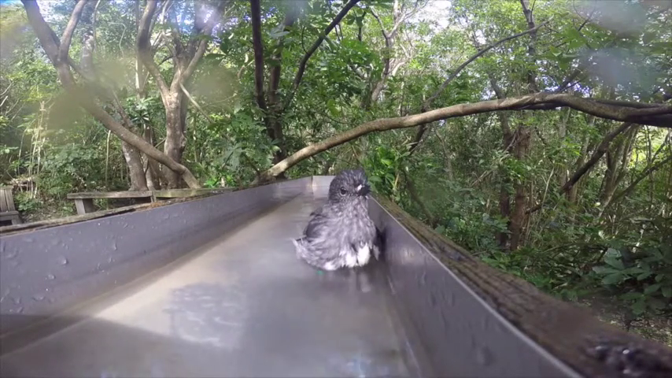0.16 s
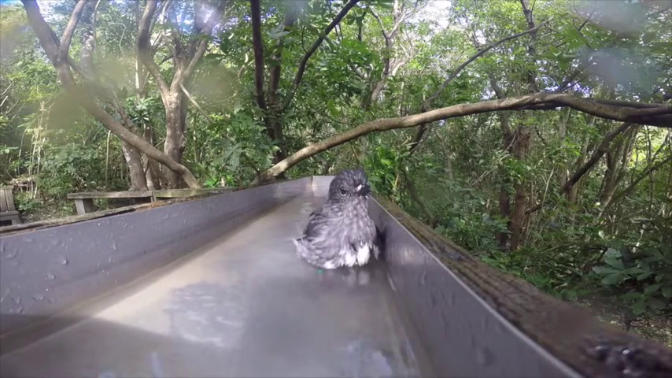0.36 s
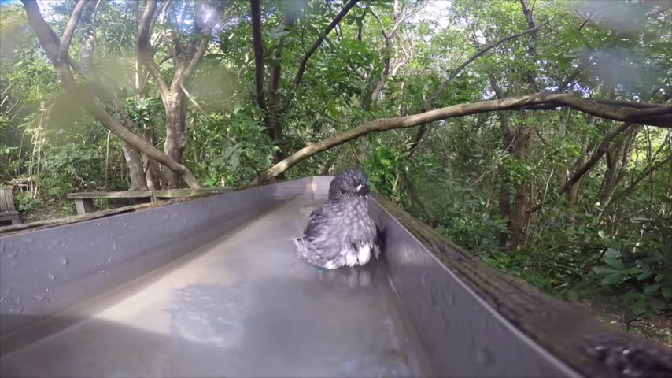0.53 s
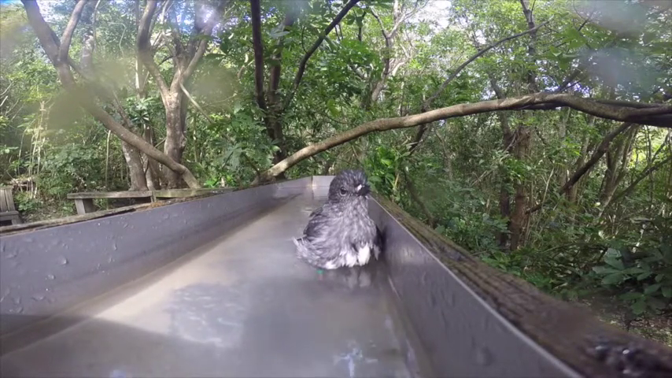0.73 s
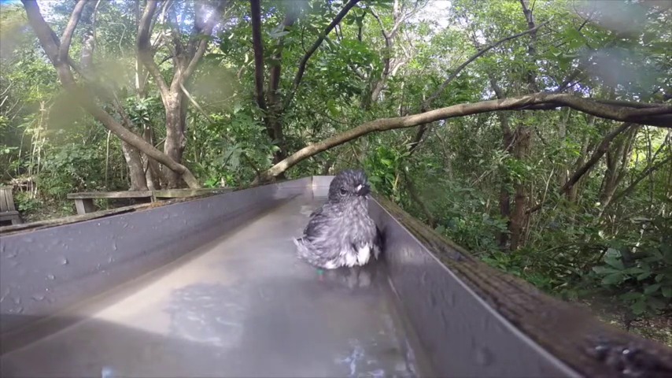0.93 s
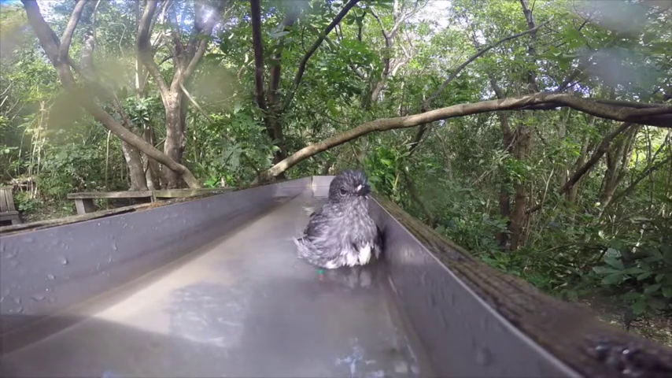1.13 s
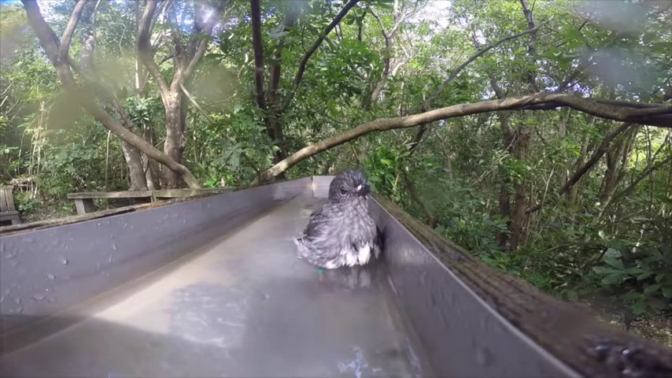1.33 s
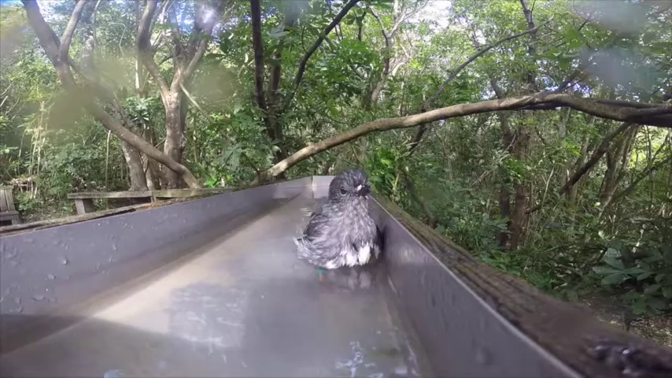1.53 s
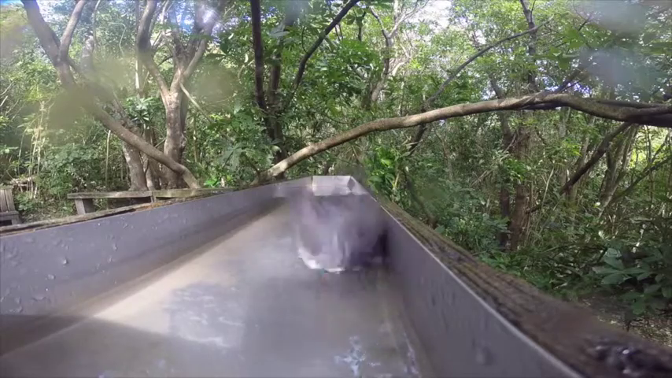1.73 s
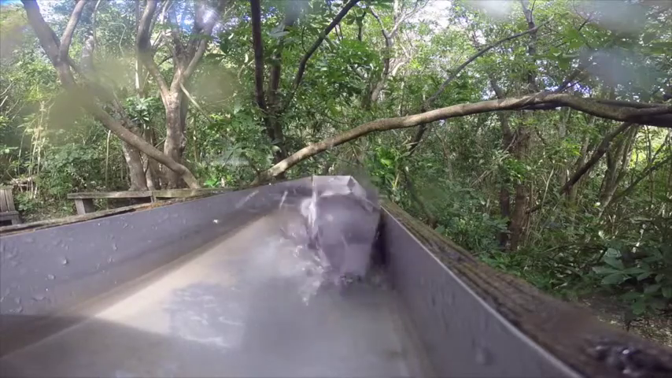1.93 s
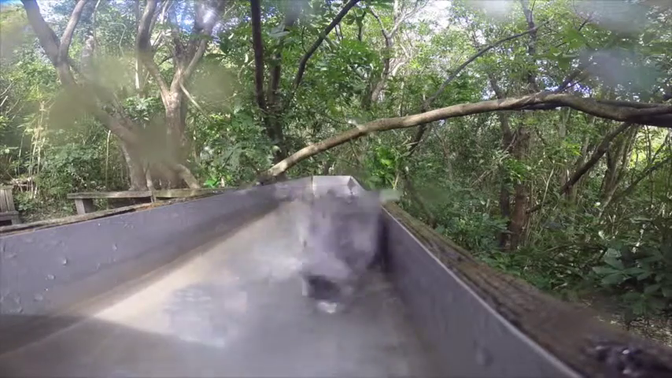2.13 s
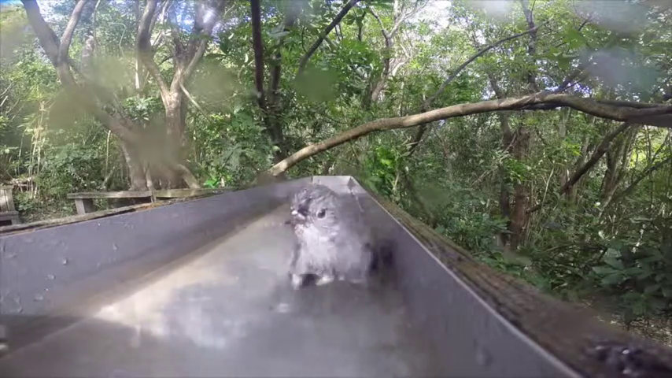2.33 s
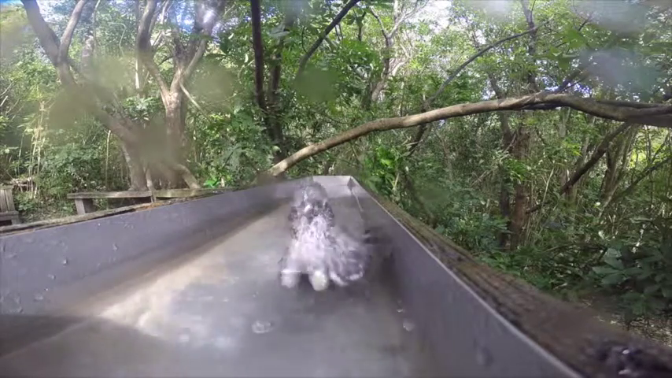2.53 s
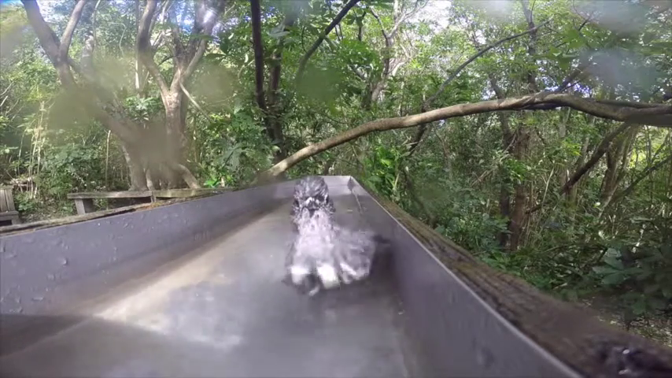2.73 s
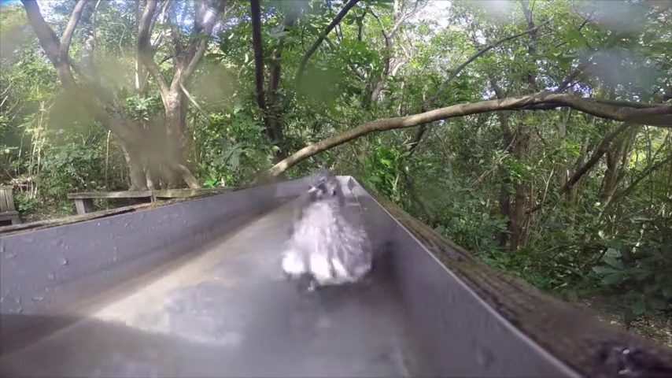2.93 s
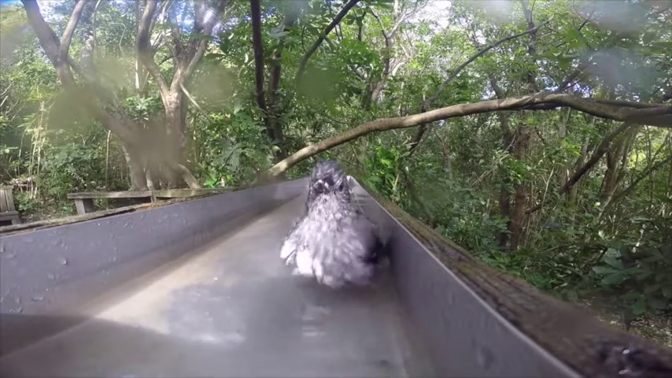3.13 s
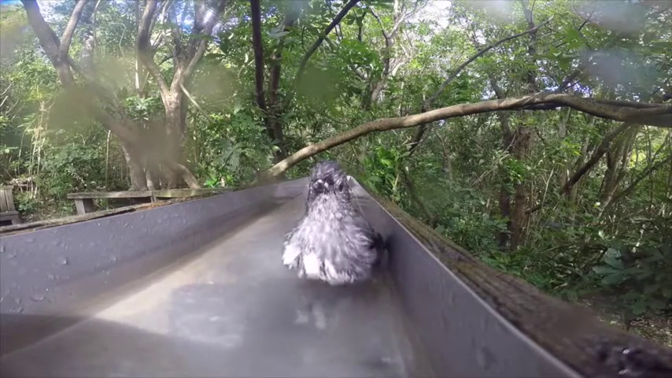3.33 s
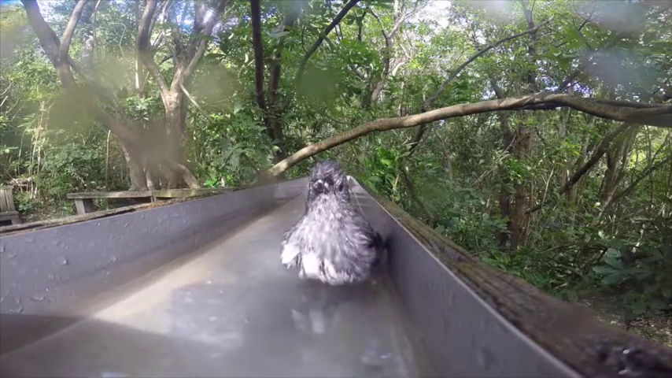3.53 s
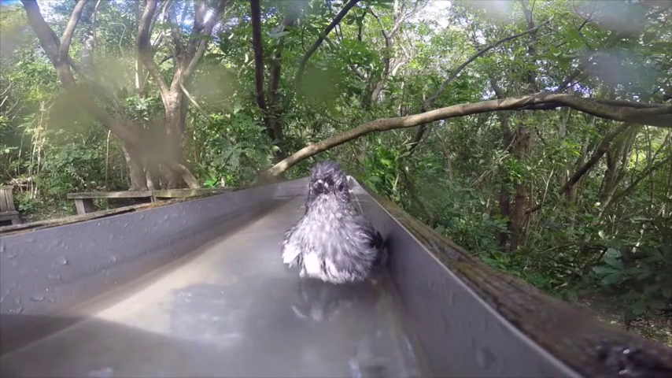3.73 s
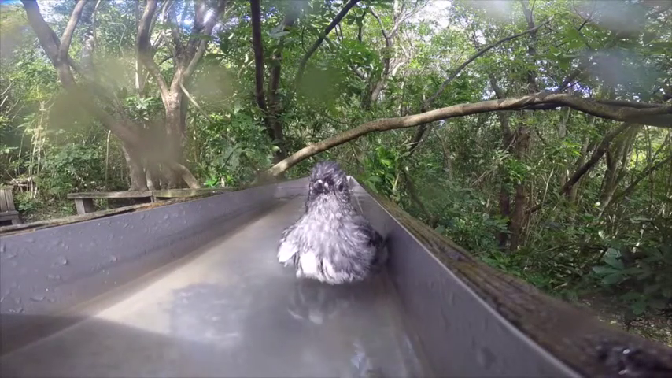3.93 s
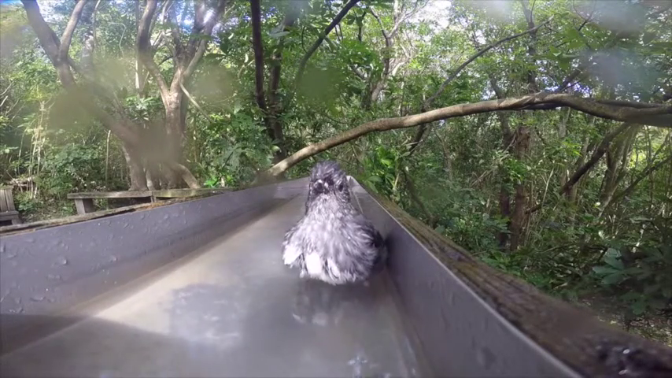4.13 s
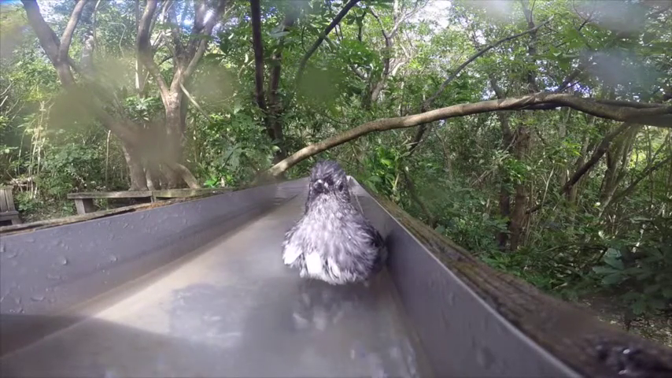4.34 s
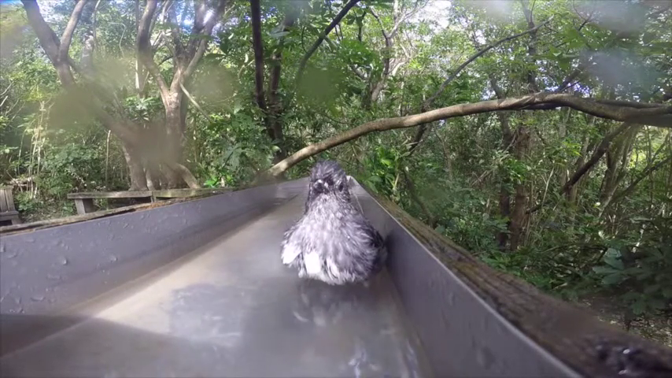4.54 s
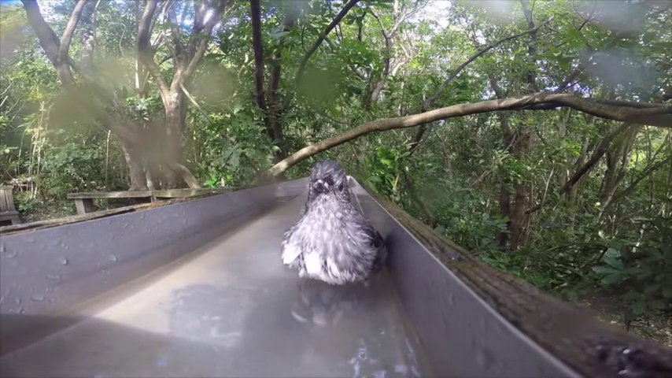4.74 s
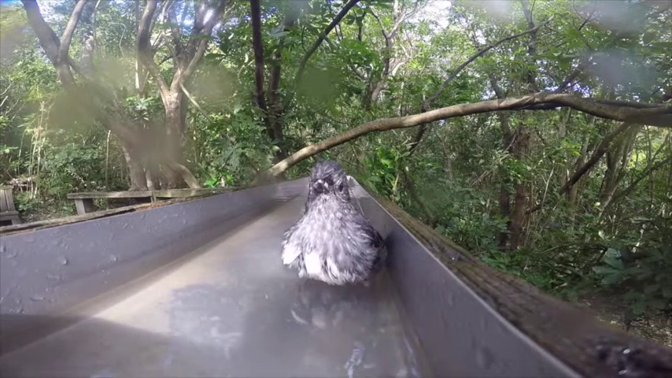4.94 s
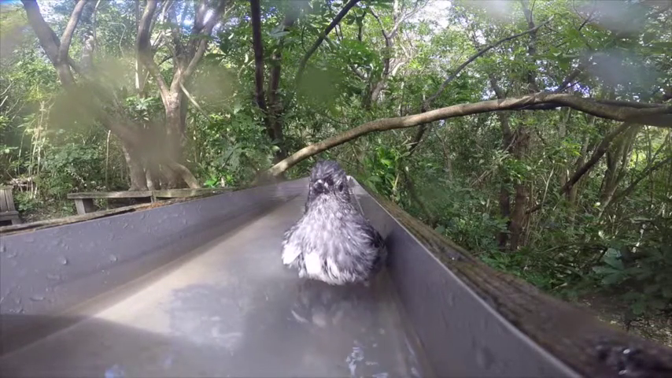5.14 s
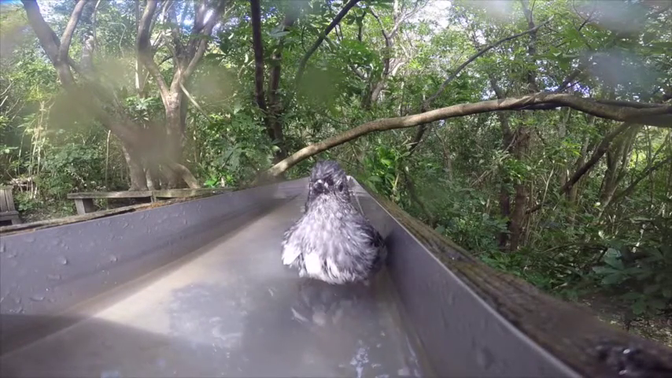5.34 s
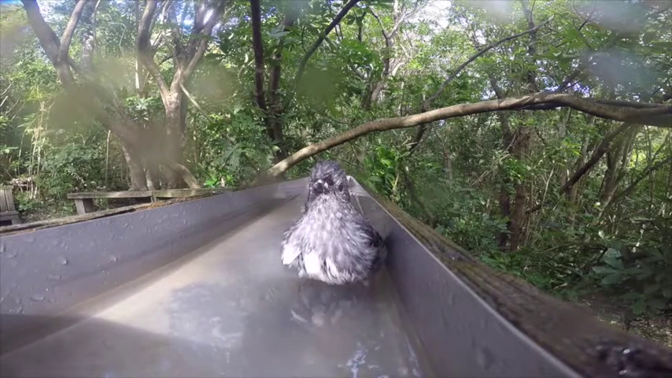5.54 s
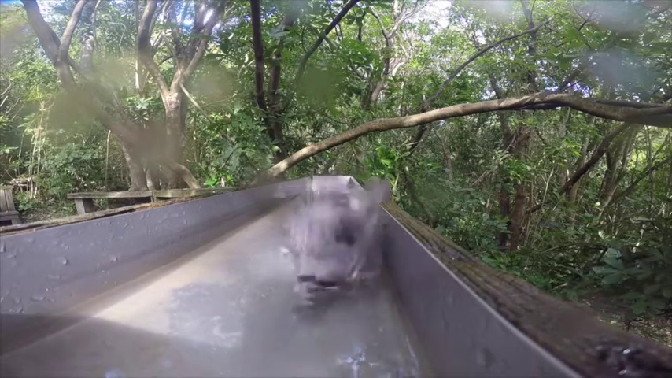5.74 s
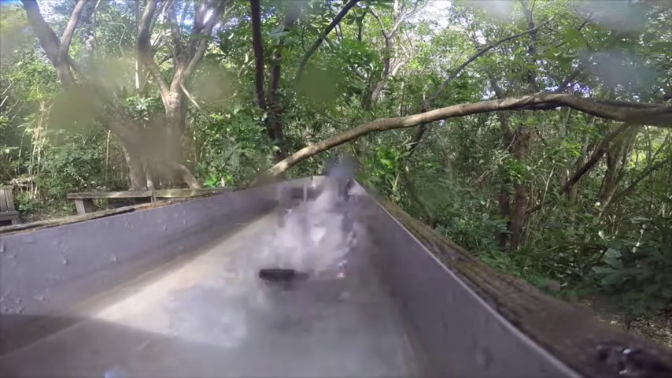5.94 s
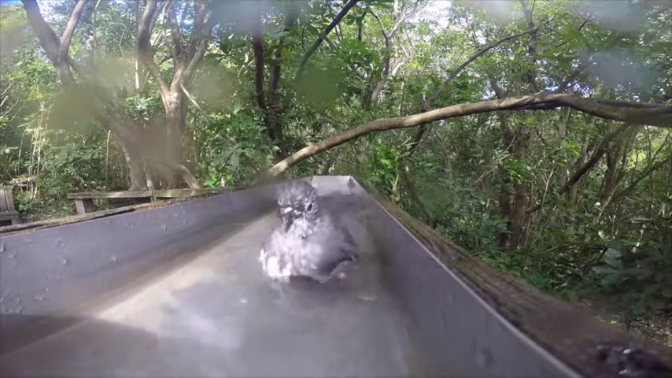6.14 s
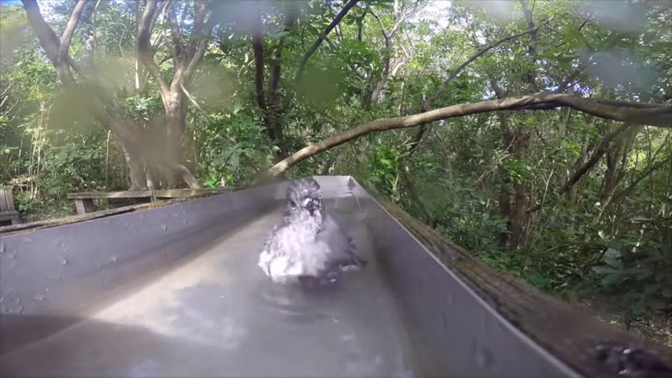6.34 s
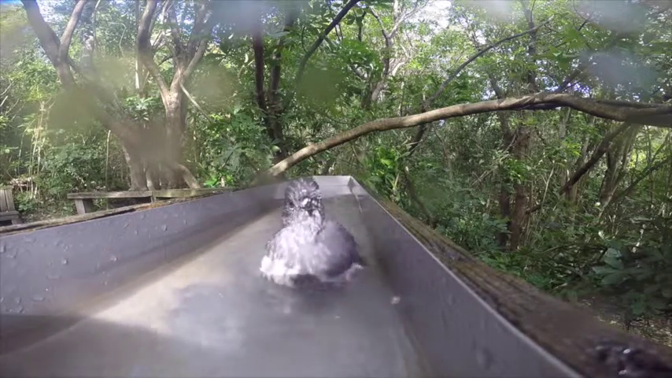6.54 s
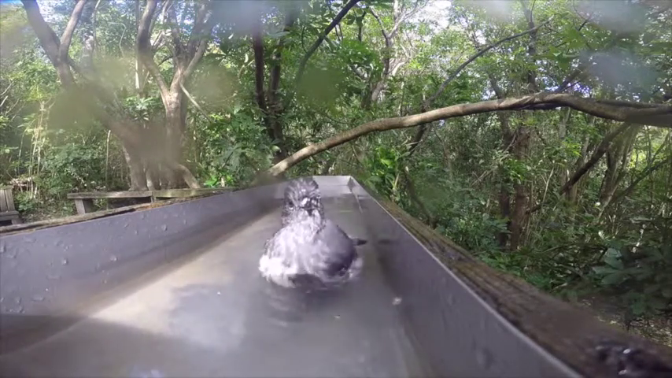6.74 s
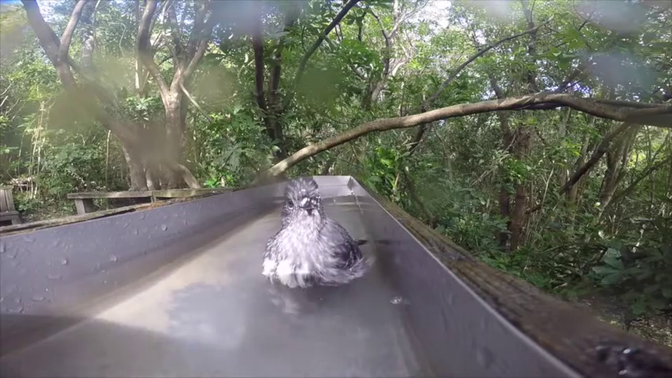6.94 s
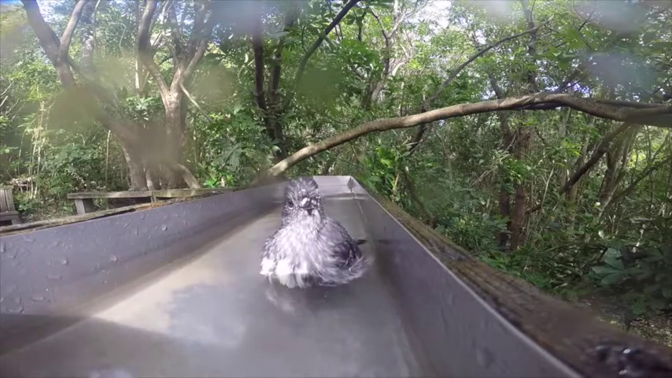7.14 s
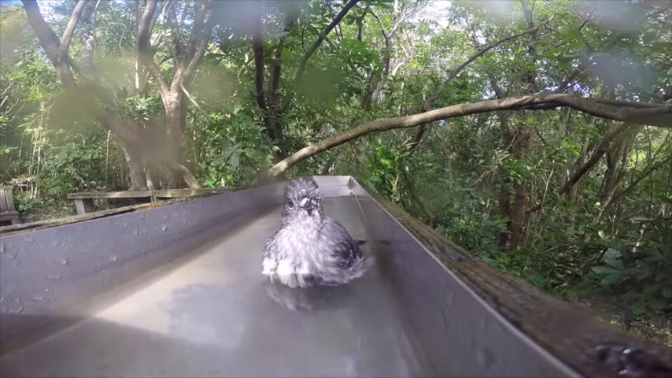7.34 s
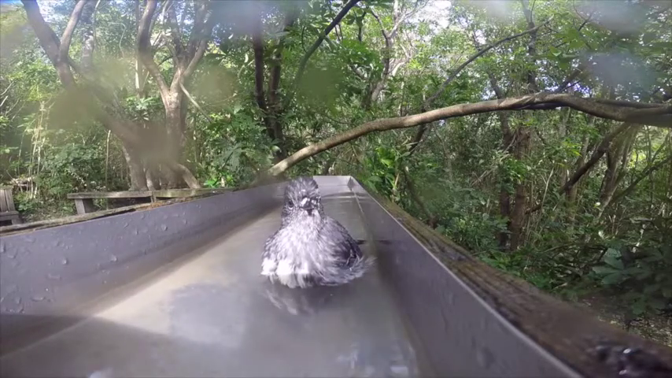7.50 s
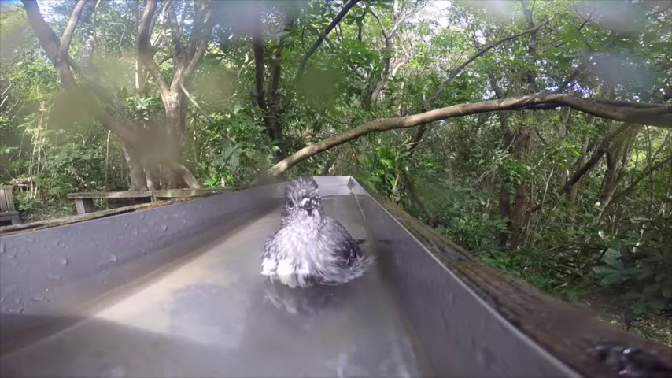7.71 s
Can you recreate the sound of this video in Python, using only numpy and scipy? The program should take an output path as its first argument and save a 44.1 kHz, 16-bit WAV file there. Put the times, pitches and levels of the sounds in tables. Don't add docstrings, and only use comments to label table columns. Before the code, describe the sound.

A small bird bathes in a shallow sheet-metal trough in a quiet wood, heard from a camera inside the trough. After a near-silent start, rapid wing slaps, knocks and pings erupt with drumming water, spray and low panel booms. A clear bubble plink and a smaller heave follow. Quiet hiss and faint claw shifts lead to a second splashing bout, which settles into air with a distant bird whistle.

```python
import sys
import numpy as np
from scipy import signal
from scipy.fft import rfft, irfft
from scipy.io import wavfile
from scipy.ndimage import uniform_filter1d

SR = 44100
rng = np.random.default_rng(int(sys.argv[2]) if len(sys.argv) > 2 else 0)


def wav_record(signal):
    frames = np.transpose(np.atleast_2d(signal))
    bounded = np.clip(frames, -1, 1)
    quanta = np.round(bounded * 32767).astype(np.int16)
    wavfile.write(sys.argv[1], SR, quanta)


def undo_db(level):
    steps = np.asarray(level, float) / 20
    return 10 ** steps


N = 342657

# [t/s, peak level/dB, centre f/Hz, t60/s]
KNOCKS = [(1.725, -51, 1490, 0.19), (1.79, -40.5, 587, 0.17), (1.832, -26.5, 620, 0.11),
          (1.853, -14, 870, 0.11), (1.99, -24, 925, 0.047), (2.115, -28, 397, 0.11),
          (2.248, -17.5, 352, 0.17), (2.336, -42, 303, 0.045), (2.397, -44, 930, 0.034),
          (2.788, -38, 970, 0.4), (3.071, -40, 584, 0.14), (3.142, -30.5, 610, 0.11),
          (3.159, -33, 520, 0.061), (3.236, -38, 1500, 0.046), (4.002, -38, 1030, 0.049),
          (5.647, -45, 700, 0.16), (5.722, -26.5, 630, 0.073), (5.791, -14, 398, 0.08),
          (6.002, -24, 1210, 0.04), (5.936, -30, 875, .06), (6.148, -33.5, 890, .05),
          (6.205, -34.5, 480, 0.05), (6.296, -35, 885, .04), (6.268, -29, 595, 0.032),
          (6.328, -22, 885, 0.044), (6.394, -23.5, 480, 0.07), (6.4, -27, 950, 0.07),
          (6.458, -25.5, 810, 0.07), (6.537, -30.5, 644, 0.057), (6.69, -35, 590, 0.057),
          (6.76, -34.5, 930, 0.057), (6.814, -42, 1120, 0.08), (6.843, -40.5, 880, .08),
          (2.071, -26.5, 985, .05), (2.62, -40, 945, .07), (2.662, -34.5, 940, .08), (3.038, -45, 950, .07),
          (3.233, -37, 950, .06), (6.56, -32.5, 280, 0.068), (6.755, -40, 326, .08), (1.8, -54, 267, .1),
          (2.3, -23.5, 256, 0.08)]
# [t/s, peak level/dB, centre f/Hz, t60/s]
THUMPS = [(1.835, -27, 270, .08), (1.856, -20.5, 267, 0.075), (2.119, -21, 190, .06),
          (2.163, -20.5, 210, .05), (2.25, -19.5, 200, .08), (3.275, -39, 230, .12), (6.46, -33, 330, .08),
          (4.004, -47, 1050, 0.23), (0, -33, 1310, 0.069), (1.853, -10, 450, 0.018),
          (2.117, -15, 303, 0.041), (2.249, -17, 930, 0.097), (3.995, -41.5, 574, 0.077),
          (5.792, -10.5, 520, 0.024), (5.8, -17, 145, 0.21), (5.799, -25.5, 606, 0.34)]
# [t/s, peak level/dB, centre f/Hz, t60/s]
SLAPS = [(1.8214, -34, 1300, .05), (2.342, -24, 2200, 0.056), (1.8525, -15.5, 1690, 0.17),
         (3.174, -28.5, 1360, 0.12), (5.664, -39.5, 1670, 0.068), (5.7214, -19, 1810, 0.12),
         (5.7916, -12.5, 2170, 0.075), (6.2373, -30, 2340, 0.031), (6.3963, -25, 1540, 0.14),
         (6.459, -29, 1560, 0.068), (6.611, -29.5, 1340, 0.16)]
# [t/s, peak level/dB, centre f/Hz, t60/s]
PINGS = [(1.8214, -31.5, 1640, 0.48), (1.929, -10.5, 2330, 0.072), (1.9613, -21.5, 2350, 0.033),
         (2.016, -26, 2470, 0.18), (2.0706, -22, 1630, 0.046), (2.1386, -12, 1640, 0.1),
         (2.298, -21, 2120, 0.1), (2.6217, -46, 2300, 0.035), (4.0314, -51, 1760, 0.08),
         (5.935, -40, 2410, 0.093), (6.0028, -22.5, 1830, 0.15), (6.09, -35, 1920, 0.08),
         (5.905, -31, 2150, 0.036), (6.2021, -32, 1790, 0.06), (6.2955, -30.5, 2620, 0.018),
         (6.3316, -35, 2190, 0.064), (6.537, -37.5, 1700, 0.078), (6.5542, -33, 1890, 0.098),
         (6.7392, -38, 2190, 0.16)]
# [t/s, peak level/dB, centre f/Hz]
CLAWS = [
    (0.548, -50.5, 780),
    (0.68, -55.5, 950),
    (3.479, -52, 846),
    (3.552, -53, 800),
    (3.647, -50, 725),
    (3.778, -51, 790),
    (4.309, -52.5, 873),
]
CLAW_T60_S = 0.1
KNOCK_WIDTH, THUMP_WIDTH, SLAP_WIDTH, PING_WIDTH = 0.48, 0.9, 0.64, 0.15
BLOW_RISE_S = 0.001

# [f/Hz, level/dB per Hz]
TROUGH_COLOUR = [(100, -38), (170, -0.5), (231, -8), (513, -4), (724, -9), (860, 0.5), (1010, -4),
                 (1480, -12.5), (2500, -15), (3200, -36), (4160, -73), (7040, -120)]
# [f/Hz, width/Hz, level/dB]
TROUGH_MODES = [(328.5, 36, 4.9), (354, 4, 10.1), (413.8, 4.8, 7.2), (530, 37, 0.83), (611.7, 28, 10.6),
                (855, 11, 4), (947, 13, 4), (1112, 19, 1.5), (1311, 43, 3.6), (1640, 16, 2.6),
                (1690, 67, 4.5), (1943, 19, 0.93), (2190, 63, 2.3), (2556, 33, 9.9)]
# [f/Hz, t60/s]
HAZE_T60 = [(200, 0.25), (900, 0.3), (3000, 0.024)]

# [t/s, churn level/dB, fling/dB: how much water leaves the surface]
BOUTS = [
    [(0.0, -57.5, 5.5), (0.2, -91, -16)],
    [(1.72, -61, -2), (1.824, -47, -6), (1.964, -37.5, -9.5), (2.012, -35, -7.5), (2.198, -32.5, -14.5),
     (2.374, -42.5, -7), (2.674, -46.5, -7.5), (2.814, -43.5, -9), (3.12, -52.5, -9.5)],
    [(3.13, -41.5, -8.5), (3.304, -56, -18), (3.6, -84, -28)],
    [(3.92, -61.5, -15), (3.99, -57.5, -4), (4.01, -66.5, 9.5), (4.15, -72, -11.5)],
    [(5.64, -67, 1.5), (5.715, -50.5, -9.5)],
    [(5.72, -47, 8), (5.9, -44.5, -4), (6.21, -50, -7.5), (6.474, -39.5, -11.5), (6.525, -46.5, -17),
     (6.56, -46.5, -6.5), (6.706, -48, -8.5), (6.866, -58, -10.5), (7.3, -78, -2)],
]
SPLIT_HZ = 1400
SPRAY_DB, SPRAY_PER_FLING = -8.5, 0.85
PATCHY_DB = 2.5
# [f/Hz, level/dB per Hz]
SPRAY_COLOUR = [(1590, -22.5), (2700, -4), (2950, -7), (4040, -8), (5110, -19), (5620, -11), (9060, -24.5),
                (10400, -18.5), (11500, -29.5), (14700, -17.5), (15600, -25)]

# [t/s, boom level/dB]
SHOVES = [(0, -47), (1.81, -37), (1.88, -33.5), (1.98, -28), (2.055, -41), (2.125, -22.5), (2.21, -21),
          (2.28, -17), (2.38, -21.5), (2.5, -21), (2.57, -24.5), (2.64, -32), (2.8, -35), (2.94, -36.5),
          (2.99, -34), (3.08, -41), (3.18, -32), (3.28, -35.5), (4.03, -53), (4.16, -59), (5.72, -47.5),
          (5.81, -23.5), (5.9, -22.5), (6.06, -35.5), (6.21, -35.5), (6.34, -34), (6.44, -36), (6.6, -32),
          (6.75, -31.5), (6.86, -37)]
SHOVE_S, RING_DB_PER_S = 0.041, 49.5
BOOM_HZ, SAG_HZ = 85.8, 0.7
# [f/Hz, width/Hz, level/dB]
PANEL_MODES = [(123.8, 14, 2), (133, 16, 6), (194, 10, -6.5), (265.4, 9.8, -7)]
PANEL_DB, PANEL_FROM_CHURN = 4.5, 0.67

# [t/s, peak level/dB, centre f/Hz, length/s]
SHEETS = [(1.789, -49.5, 4080, 0.02), (1.85, -40.5, 5600, 0.028), (1.8831, -47.5, 3970, 0.075),
          (1.93, -38.5, 5370, 0.033), (2.009, -43, 3280, 0.038), (2.09, -40, 4260, 0.02),
          (2.163, -39.5, 3330, 0.025), (2.199, -40, 3900, 0.053), (2.237, -34, 3050, 0.014),
          (2.271, -41, 4160, 0.037), (2.344, -40, 3920, 0.031), (2.517, -47.5, 3980, 0.024),
          (2.458, -54, 5700, 0.065), (2.624, -49.5, 3300, 0.032), (2.67, -55, 3900, .02),
          (2.745, -54, 4100, 0.032), (2.8, -62, 4130, 0.055), (3.136, -52.5, 5800, 0.037),
          (3.169, -48.5, 3140, 0.028), (5.7205, -38.5, 3880, 0.025), (5.789, -36.5, 6300, 0.025),
          (5.9345, -38.5, 4440, 0.038), (6, -35, 3350, 0.038), (6.086, -43.5, 4080, 0.034),
          (6.2033, -46.5, 3530, 0.019), (6.265, -46, 3490, 0.021), (6.3285, -41, 3500, 0.017),
          (6.391, -45.5, 5300, 0.044), (6.4565, -44.5, 3380, 0.016), (6.665, -45.5, 3500, 0.035),
          (6.75, -51, 4090, 0.032)]
# [t/s, peak level/dB, centre f/Hz, length/s]
MIST = [(0, -44, 12000, 0.015), (1.7894, -50.5, 10200, 0.037), (1.853, -48, 9500, 0.009),
        (1.927, -34, 10500, 0.014), (2.0394, -50, 8460, 0.019), (2.076, -54, 12800, 0.017),
        (2.1928, -42, 9800, 0.016), (2.2373, -47, 10300, 0.03), (2.277, -42, 13800, 0.02),
        (2.3407, -45, 10200, 0.014), (2.632, -64, 10000, .015), (2.748, -58, 10200, .025),
        (2.76, -56, 8300, .025), (2.822, -56, 8000, 0.02), (4.001, -46.5, 12500, 0.021),
        (5.664, -58, 14000, 0.041), (5.7213, -46, 10000, 0.016), (5.789, -62, 13900, 0.014),
        (5.9344, -48, 10000, 0.021), (6.0032, -39.5, 13900, 0.022), (6.093, -42, 14100, 0.015),
        (6.341, -51, 11500, .014), (6.39, -55, 10300, .014), (6.408, -56, 10100, .016),
        (6.478, -55, 13000, .016), (6.5565, -51.5, 10700, 0.02), (6.609, -53, 13500, .016)]
# [t/s,
# peak level/dB, centre f/Hz, length/s]
PUFFS = [(1.765, -50, 15000, 0.02), (1.897, -51, 10600, .014), (1.994, -56, 10200, 0.0081),
         (2.02, -54, 14300, .016), (1.889, -43, 14200, .018), (1.955, -48, 9800, 0.025),
         (2.0026, -46, 8070, 0.012), (2.3095, -44.5, 10300, 0.015), (2.42, -53, 4130, .025),
         (2.587, -50, 4150, .022), (2.809, -55, 10900, .012), (5.676, -50, 8700, 0.025),
         (5.977, -44, 13600, .016), (6.047, -43.5, 14900, 0.012), (6.134, -48, 14100, 0.03),
         (6.2105, -51, 13800, 0.016), (6.6095, -44, 6900, 0.028)]
SHEET_TUNED, PUFF_TUNED = 0.2, 0.67
# [t/s, peak level/dB, centre f/Hz, width as a share of the centre]
TICKS = [(1.8845, -46, 4500, .7), (1.8905, -49, 5500, .9), (1.9232, -38, 6500, 0.76),
         (1.9565, -38, 10500, 0.86), (1.962, -28, 4210, 0.94), (1.97, -38, 4500, .4),
         (1.976, -36, 7500, 1.1), (2.0045, -38, 7000, .9), (2.0945, -40, 6500, 1.3),
         (2.106, -33, 4400, 0.4), (2.124, -43, 9000, 1.3), (2.148, -39, 4200, .3), (2.521, -46, 7200, .35),
         (2.545, -45, 5500, 1), (2.622, -36, 2800, 0.3), (2.784, -55, 7700, .2), (2.8225, -49, 5500, .9),
         (2.976, -39, 2400, 0.32), (5.9648, -35, 6500, 1.1), (5.9872, -27.5, 4300, 0.76),
         (5.961, -44, 10500, .6), (6.177, -36, 7700, .4), (6.2391, -37, 6000, 1.2),
         (6.249, -36, 5470, 0.79), (6.2984, -24, 5400, 1.05), (6.311, -45, 10500, .6),
         (6.3765, -41, 4800, 1), (6.4365, -46, 4500, .7), (6.442, -51, 6800, .3), (6.647, -42, 7500, 1.3),
         (6.6603, -34, 6440, 0.85), (6.668, -46, 7000, .5), (6.681, -52, 8500, .6), (6.739, -49, 9000, 1.2)]
# [t/s, peak level/dB, f/Hz, t60/s]
PLINKS = [
    (0, -43, 869, 0.25),
    (0, -49, 1329, 0.16),
    (2.85, -27, 2190, 0.095),
    (3.071, -43, 3650, .02),
    (3.131, -40, 3640, .025),
    (3.235, -44, 2190, 0.071),
]
SQUEAK_S, SQUEAK_DB, SQUEAK_HZ = 5.668, -41.5, 10300
SLIDE_HZ_PER_S, SQUEAK_RISE_S, SQUEAK_DB_PER_S = 40000, 0.0015, 750

# [f/Hz, level/dB per Hz]
AIR_COLOUR = [(8.8, -21), (15, 7.5), (47, 1), (317, -18.5), (5480, -28), (6340, -27), (6910, -31),
              (8720, -33.5), (12000, -35.5), (13100, -35.5), (15600, -40)]
AIR_DB = -57
# [t/s, length/s, f/Hz, glide/Hz, level/dB]
WHISTLES = [
    (5.191, 0.165, 1760, 15, -71),
    (5.345, .05, 1775, 20, -76),
    (5.392, .11, 1748, 15, -76),
    (5.497, 0.13, 1830, 8, -65),
    (5.657, 0.067, 4100, 0, -68),
    (7.479, 0.26, 1636, -23, -70),
    (7.574, 0.074, 1630, -8, -62),
]
# [start t/s, end t/s, level/dB]
TRILLS = [
    (3.566, 3.784, -74),
    (3.84, 3.987, -74),
]
# [f/Hz, width/Hz, level/dB]
TRILL_BANDS = [(4400, 210, 5), (11000, 450, -5.5)]

PICTURES_PER_S = 30 / 1.001
WHINE_HZ, WHINE_DB, OVERTONE_DB = 6306.5, -63.5, -79.5
BLIP_HZ, BLIP_DB = 8570, -68.5
EDGE_HZ = 15550


def read(points, hz):
    f, value = np.transpose(points)
    return np.interp(np.log(hz + 1), np.log(f + 1), value)


def evened(x):
    return x / np.sqrt(np.mean(x ** 2) + 1e-20)


def smoothed(x, span):
    return uniform_filter1d(uniform_filter1d(x, span), span)


def curve(tables, column):
    rows = np.concatenate(tables)
    return np.interp(np.arange(N) / SR, rows[:, 0], rows[:, column])


def level(tables, column):
    t = np.arange(N) / SR
    on = sum((t >= rows[0][0]) & (t <= rows[-1][0]) for rows in tables)
    return undo_db(curve(tables, column)) * uniform_filter1d(on * 1., 600, mode="nearest")


def coloured(x, points):
    hz = np.fft.rfftfreq(x.shape[-1], 1 / SR)
    return irfft(rfft(x) * undo_db(read(points, hz)), x.shape[-1])


def resonate(x, hz, width):
    hz = min(hz, SR * 0.45)
    return signal.lfilter(*signal.iirpeak(hz, hz / width, SR), x)


def add(mix, s, sound):
    part = mix[round(s * SR):][:len(sound)]
    part += sound[:len(part)]


def blows(table, trough):
    mix, t = np.zeros(N), np.arange(6000) / SR
    noises = rng.standard_normal((len(table), 6000))
    for (s, db, hz, t60, share), noise in zip(table, noises):
        knock = 13 * (t == 0)
        burst = (noise + knock) * undo_db(-60 * t / max(t60, 0.002))
        width = np.clip(share, 0.06, 1.2) * hz
        tuned = evened(resonate(resonate(burst, hz, width), hz, 1.5 * width))
        ring = signal.fftconvolve(tuned + 0.04 * evened(burst), trough)
        rise = np.minimum(np.arange(len(ring)) / (BLOW_RISE_S * SR), 1)
        ring *= np.sin(np.pi / 2 * rise) ** 2
        add(mix, s, undo_db(db - 1.5) * ring / abs(ring).max())
    return mix


def trough_response():
    hz, t, z = signal.stft(rng.standard_normal(12000), SR, nperseg=256)
    decay = undo_db(-60 * t / read(HAZE_T60, hz)[:, None])
    haze = signal.istft(z * decay, SR, nperseg=256)[1][:12000]
    haze /= np.linalg.norm(haze)
    tick = signal.unit_impulse(12000)
    modes = sum(undo_db(db) * resonate(tick, f, width) for f, width, db in TROUGH_MODES)
    gain = undo_db(2 * read(TROUGH_COLOUR, np.linspace(0, SR / 2, 1025)))
    taps = signal.minimum_phase(signal.firwin2(2047, np.arange(1025) / 1024, gain))
    return signal.fftconvolve(0.95 * tick + 0.29 * haze + 0.87 * modes, taps)


def slosh(trough):
    clumps = undo_db(5.5 * np.tanh(0.74 * evened(smoothed(rng.standard_normal(N), 500))))
    churn, fling_db = level(BOUTS, column=1), curve(BOUTS, column=2)
    impacts = np.sqrt(clumps) * surges(6.8, 0.037) * patter(2000, 1.5)
    drum = signal.oaconvolve(impacts, trough)[:N]
    low = signal.sosfiltfilt(signal.butter(3, SPLIT_HZ, fs=SR, output="sos"), drum)
    drum = evened(low) + undo_db(fling_db + 3.0) * evened(drum - low)
    spray = coloured(np.sqrt(clumps) * surges(4, 0.025) * patter(2500, 1.6), SPRAY_COLOUR)
    spray = evened(resonate(spray, 4000, 4100) + 1.1 * resonate(spray, 4200, 298))
    spray_gain = undo_db(SPRAY_DB + SPRAY_PER_FLING * fling_db)
    return undo_db(-2.13) * churn * patchy(drum + spray_gain * spray)


def patter(per_s, spread_db):
    size = undo_db(spread_db * np.minimum(rng.exponential(1, N), 4))
    size = size * (rng.random(N) < per_s / SR)
    return evened(size * rng.standard_normal(N)) + 0.72 * rng.standard_normal(N)


def surges(settle_db, settle_s):
    starts = np.sort([0] + [row[0] for row in KNOCKS + SLAPS + PINGS])
    t = np.arange(N) / SR
    since = t - starts[np.searchsorted(starts, t, "right") - 1]
    return undo_db(-settle_db * (1 - np.exp(-since / settle_s)))


def patchy(x):
    z = signal.stft(x, nperseg=256, noverlap=192)[2]
    field = rng.standard_normal(z.shape)
    for _ in range(2):
        field = uniform_filter1d(uniform_filter1d(field, size=3, axis=0), size=12, axis=1)
    return signal.istft(z * undo_db(PATCHY_DB * evened(field)), nperseg=256, noverlap=192)[1][:N]


def boom():
    size = undo_db(swing_db())
    pitch = BOOM_HZ - SAG_HZ * size / size.max()
    hum = np.sqrt(2) * size * np.sin(2 * np.pi * np.cumsum(pitch) / SR)
    push = patter(170, 3.6)
    panel = sum(undo_db(db) * resonate(resonate(push, f, width), f, 3 * width) for f, width, db in PANEL_MODES)
    steady = panel / np.sqrt(uniform_filter1d(panel ** 2, 6000) + 1e-12)
    heave = evened(resonate(resonate(push, 63, 21.08), 64, 30.8))
    churn = abs(level(BOUTS, column=1))
    rough_size = undo_db(PANEL_DB) * size ** (1 - PANEL_FROM_CHURN) * churn ** PANEL_FROM_CHURN
    return hum + rough_size * surges(3.7, 0.018) * (steady + undo_db(-3.5) * heave)


def swing_db():
    s, db = np.transpose(SHOVES)
    t = np.arange(N) / SR
    last = np.searchsorted(s, t, "right") - 1
    size = undo_db(db[last] - RING_DB_PER_S * (t - s[last]))
    return 20 * np.log10(abs(smoothed(size, round(SHOVE_S * SR))) + 1e-9)


def flung_water(table, relative_width, tuned, rise_s=0.0025):
    mix, t = np.zeros(N), np.arange(4096) / SR
    noises = coloured(rng.standard_normal((len(table), 4096)), SPRAY_COLOUR)
    for (s, db, hz, length), noise in zip(table, noises):
        wide = evened(resonate(noise, hz, 0.977 * hz))
        width = relative_width * hz
        narrow = evened(resonate(resonate(noise, hz, width), hz, width))
        shape = np.exp(-1.5 * (t / max(length, 0.002)) ** 2) * np.minimum(t / rise_s, 1)
        burst = ((1 - tuned) * wide + tuned * narrow) * shape
        add(mix, s, undo_db(db + 4.5) * burst / abs(burst).max())
    return mix


def drop_ticks():
    mix, t = np.zeros(N), np.arange(4096) / SR
    noises = rng.standard_normal((len(TICKS), 4096))
    for (s, db, hz, share), noise in zip(TICKS, noises):
        width = np.clip(share, 0.1, 1.6) * hz
        tick = resonate(noise * np.exp(-t / 0.0012), 0.88 * hz, width)
        tick = resonate(tick, 0.78 * hz, 1.3 * width)
        add(mix, s, undo_db(db) * tick / abs(tick).max())
    return mix


def clear_plinks():
    mix, t = np.zeros(N), np.arange(4096) / SR
    for s, db, hz, t60 in PLINKS:
        rise = np.sin(np.pi / 2 * np.minimum(12 * t / t60, 1)) ** 2
        tone = np.sin(2 * np.pi * hz * t * (1 + 0.096 * t))
        add(mix, s, undo_db(db - 60 * t / t60) * rise * tone)
    return mix


def squeak():
    since = np.arange(N) / SR - SQUEAK_S
    after = np.maximum(since, 0)
    flutter = evened(smoothed(rng.standard_normal(N), 26))
    pitch = np.maximum(SQUEAK_HZ - SLIDE_HZ_PER_S * after, 0.88 * SQUEAK_HZ)
    size = undo_db(SQUEAK_DB - SQUEAK_DB_PER_S * after) * np.exp(np.minimum(since, 0) / SQUEAK_RISE_S)
    return size * (2.4 + flutter) * np.sin(2 * np.pi * np.cumsum(pitch) / SR)


def whistles():
    mix = np.zeros(N)
    for s, length, hz, glide_hz, db in WHISTLES:
        u = np.arange(0, length, 1 / SR) / length
        swell = np.sin(np.pi * u) ** 0.57
        tremolo = 1 + 0.17 * np.sin(2 * np.pi * 28 * length * u)
        tone = np.sin(2 * np.pi * np.cumsum(hz + glide_hz * (u - 0.5)) / SR)
        add(mix, s, np.sqrt(2) * undo_db(db) * swell * tremolo * tone)
    return mix


def insect_trills():
    t = np.arange(N) / SR
    buzz = evened(sum(undo_db(db) * resonate(rng.standard_normal(N), f, width) for f, width, db in TRILL_BANDS))
    return buzz * sum(undo_db(db) * (t > start) * (t < end) for start, end, db in TRILLS)


def wood_air():
    return undo_db(AIR_DB) * evened(coloured(rng.standard_normal(N), AIR_COLOUR))


def camera_whine():
    t = np.arange(N) / SR
    since = t % (1 / PICTURES_PER_S)
    turn = 2 * np.pi * WHINE_HZ * since
    tone = undo_db(WHINE_DB) * np.sin(turn) + undo_db(OVERTONE_DB) * np.sin(2 * turn)
    tone = tone * np.minimum(since / 0.00317, 1)
    blip = np.sin(2 * np.pi * BLIP_HZ * t) * np.exp(-((since - 0.007) / 0.0032) ** 2)
    return tone + undo_db(BLIP_DB) * blip


def scene():
    trough = trough_response()
    kinds = [(KNOCKS, KNOCK_WIDTH), (THUMPS, THUMP_WIDTH), (SLAPS, SLAP_WIDTH), (PINGS, PING_WIDTH)]
    hits = [(*row, width) for table, width in kinds for row in table]
    hits += [(*row, CLAW_T60_S, KNOCK_WIDTH) for row in CLAWS]
    metal = blows(hits, trough) + slosh(trough) + boom()
    water = flung_water(SHEETS, 0.12, SHEET_TUNED) + flung_water(MIST, 0.042, SHEET_TUNED)
    water = water + flung_water(PUFFS, 0.091, PUFF_TUNED, rise_s=0.0046)
    water = water + drop_ticks() + clear_plinks() + squeak()
    wood = whistles() + insect_trills() + wood_air()
    return (metal + water + wood)[None]


def top_cut(x):
    return signal.sosfilt(signal.butter(12, 16440, fs=SR, output="sos"), x)


def record(dry):
    edge = signal.firwin(255, EDGE_HZ, window=("kaiser", 8), fs=SR)[None]
    mix = signal.oaconvolve(dry + camera_whine(), edge, "same")
    return top_cut(mix)


dry = scene()
out = record(dry)
wav_record(out)
```